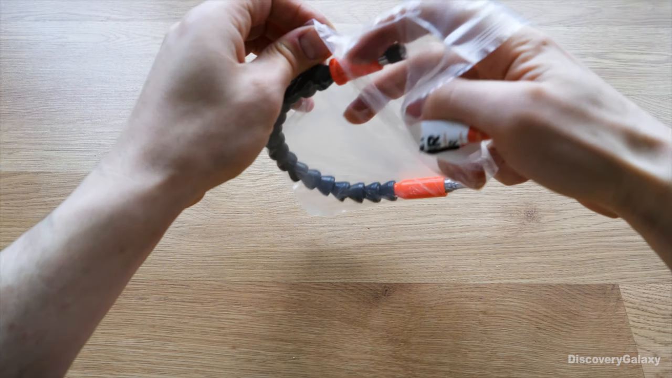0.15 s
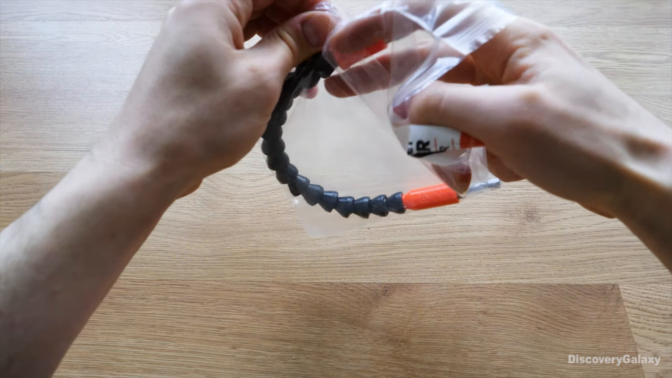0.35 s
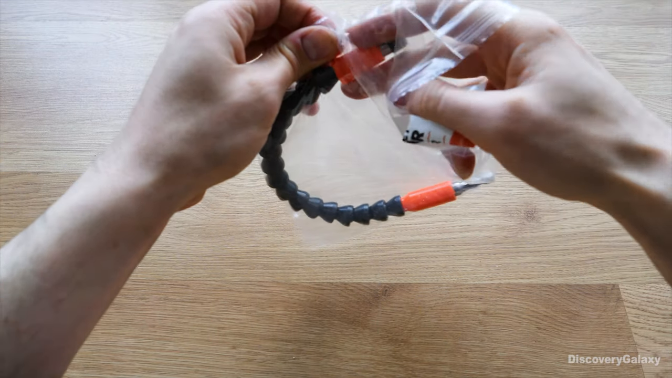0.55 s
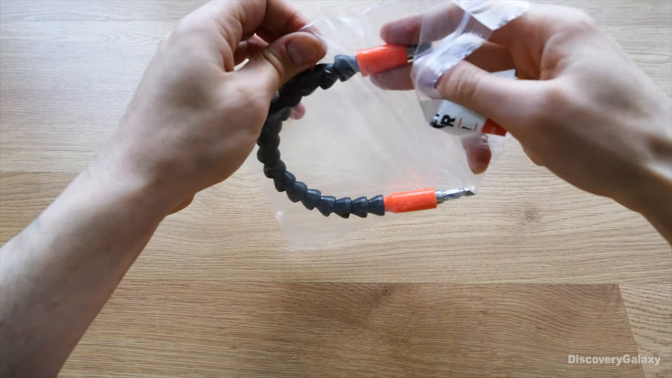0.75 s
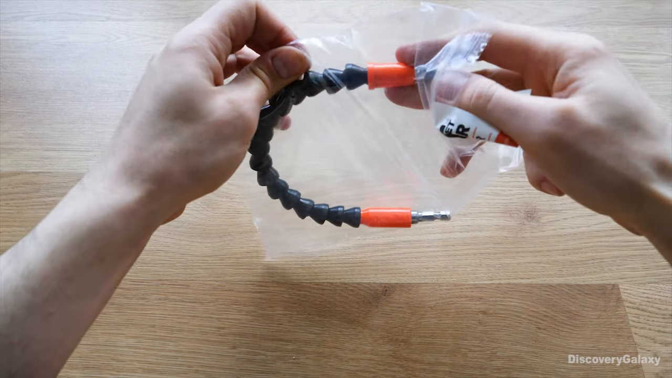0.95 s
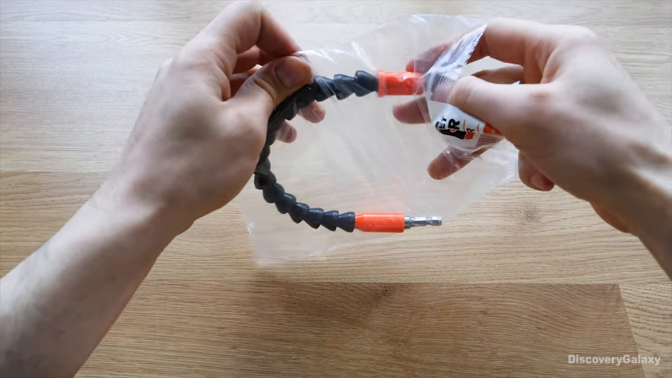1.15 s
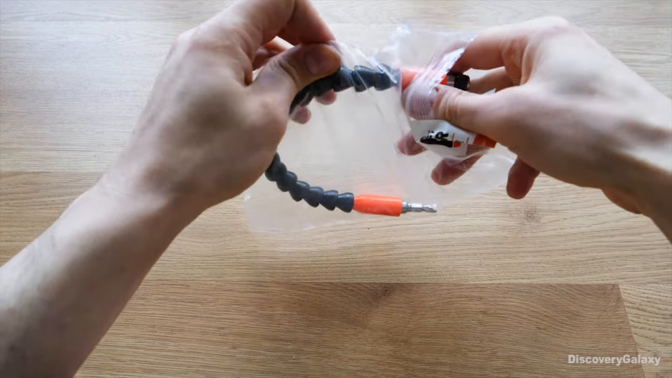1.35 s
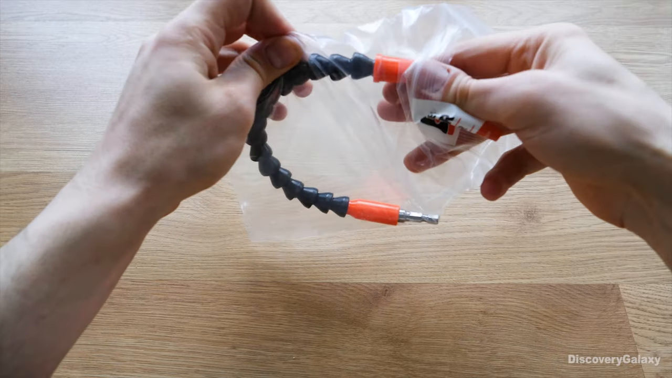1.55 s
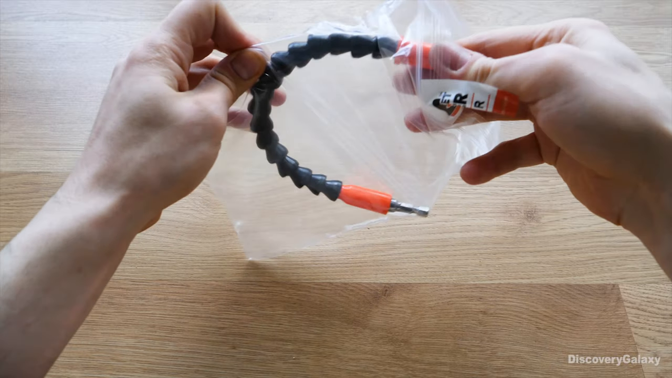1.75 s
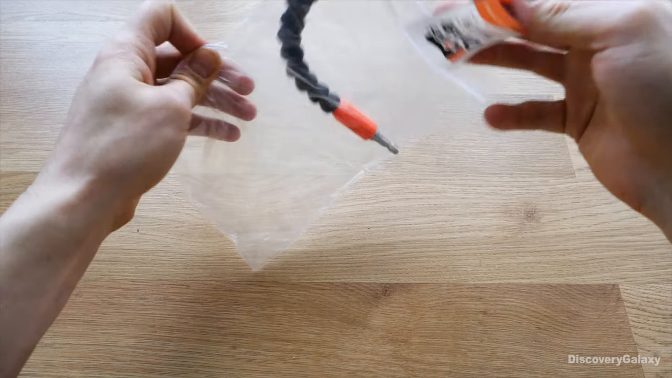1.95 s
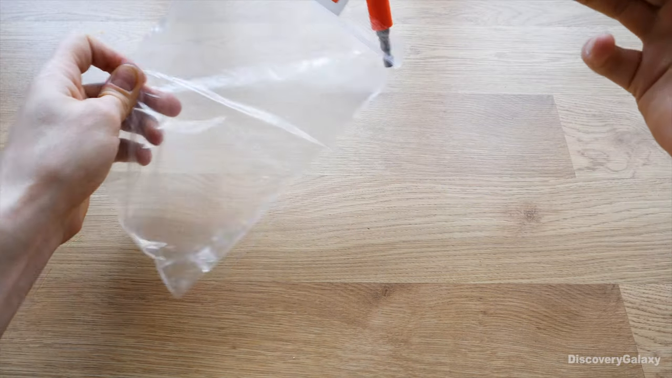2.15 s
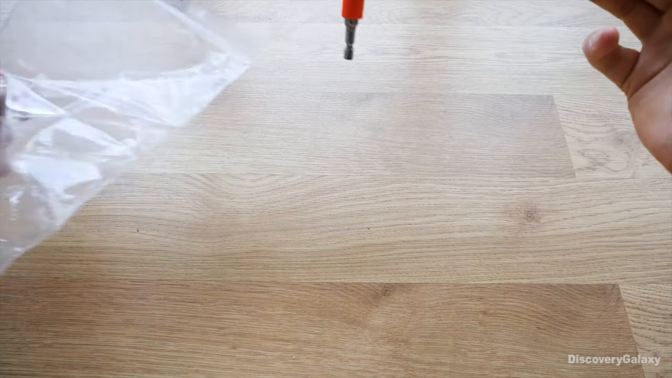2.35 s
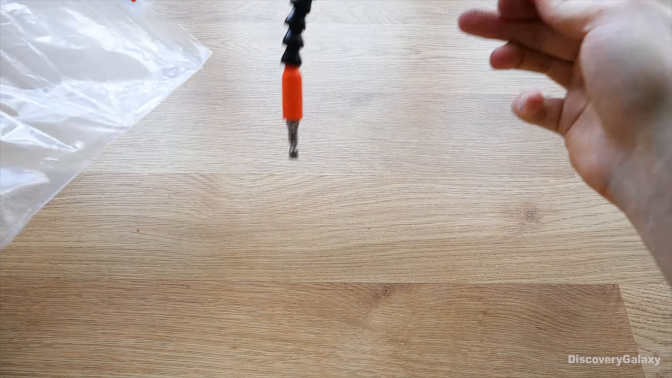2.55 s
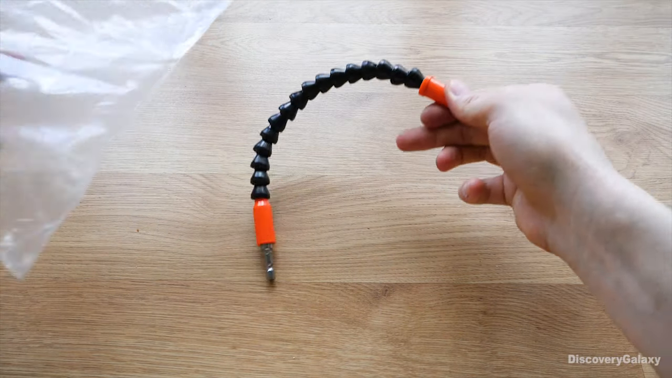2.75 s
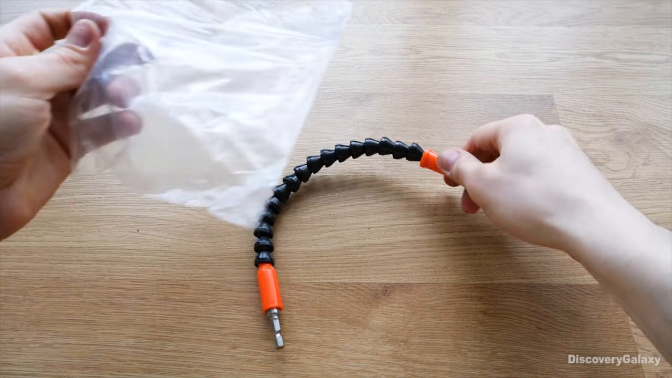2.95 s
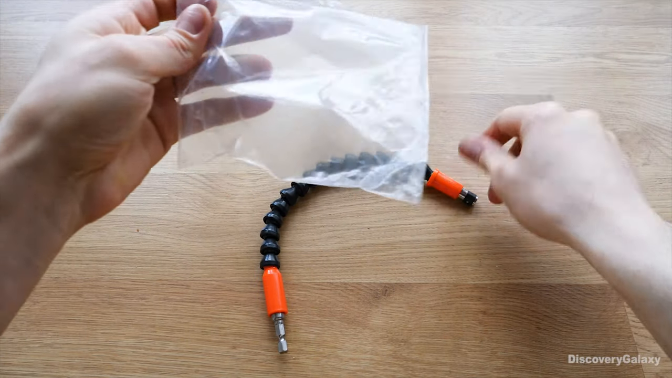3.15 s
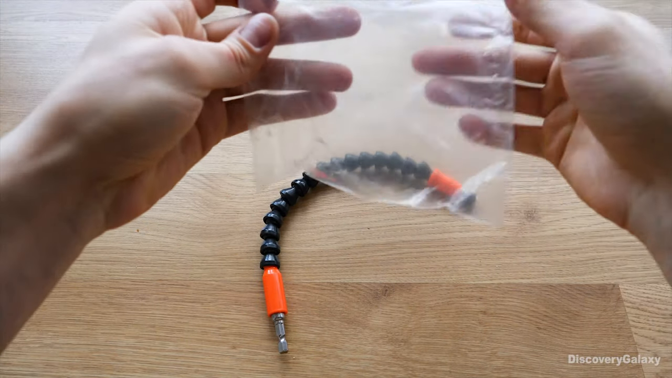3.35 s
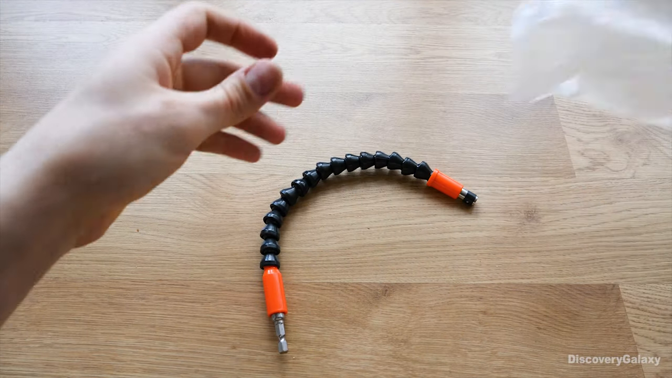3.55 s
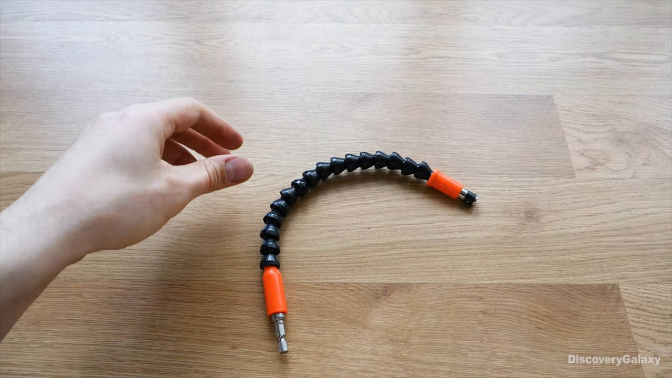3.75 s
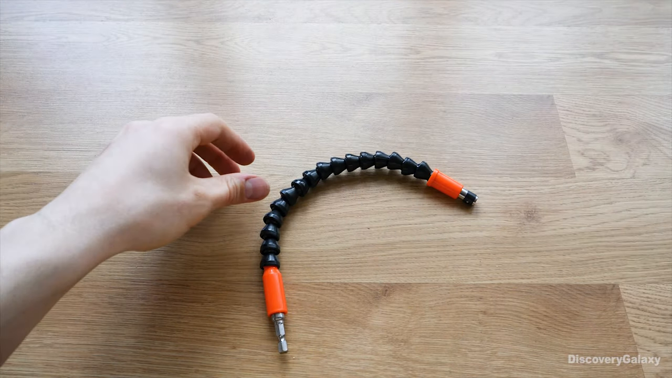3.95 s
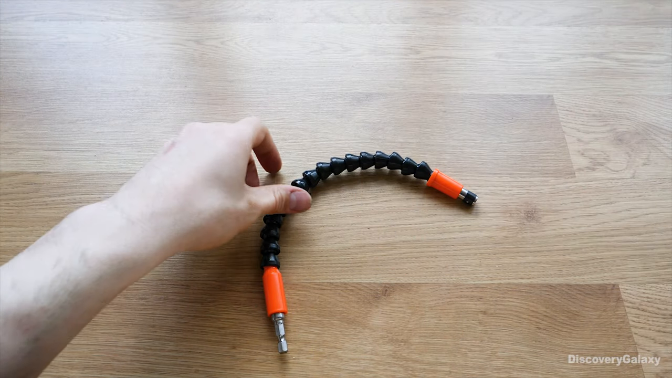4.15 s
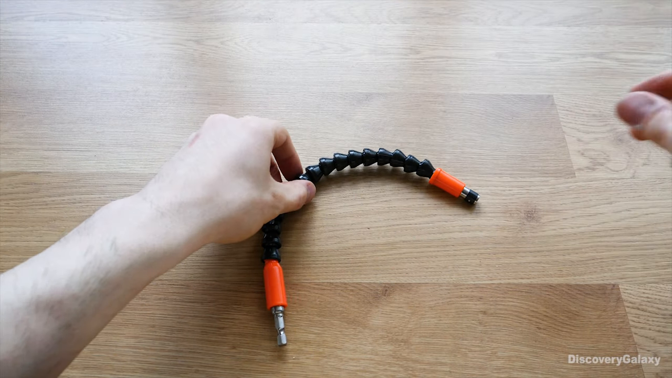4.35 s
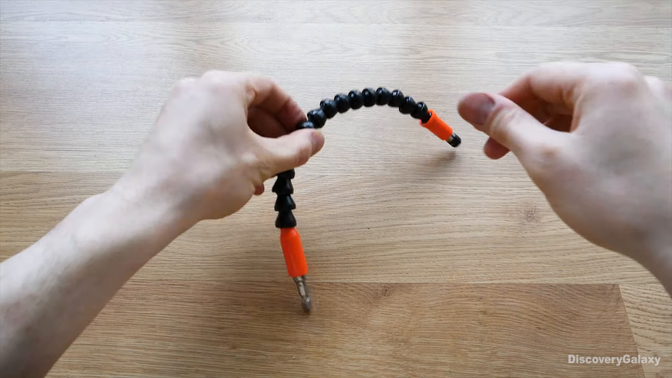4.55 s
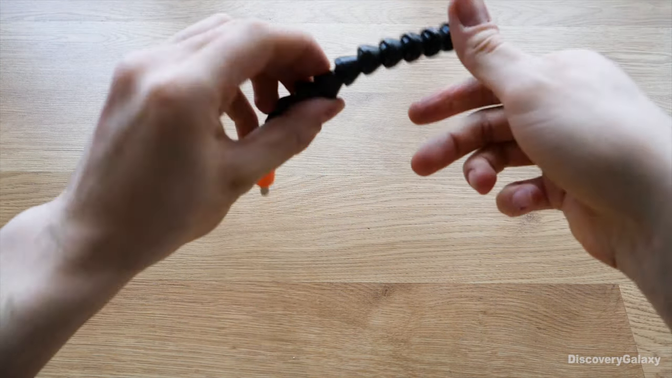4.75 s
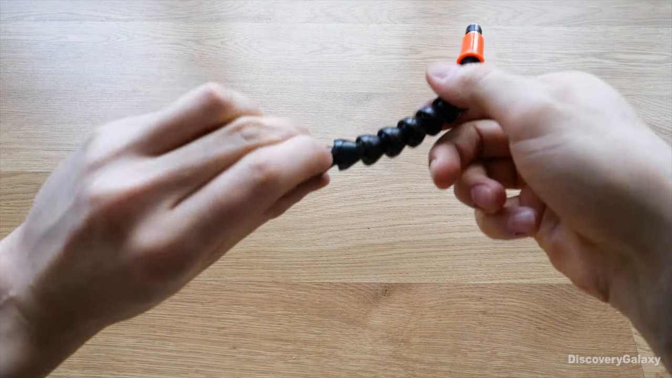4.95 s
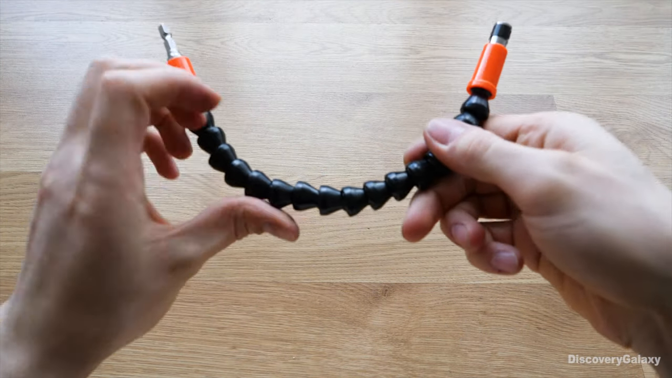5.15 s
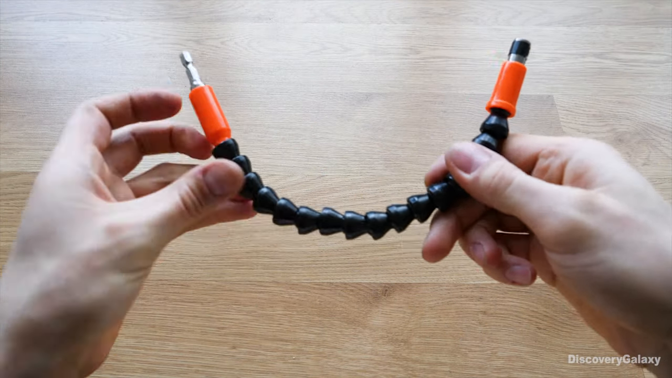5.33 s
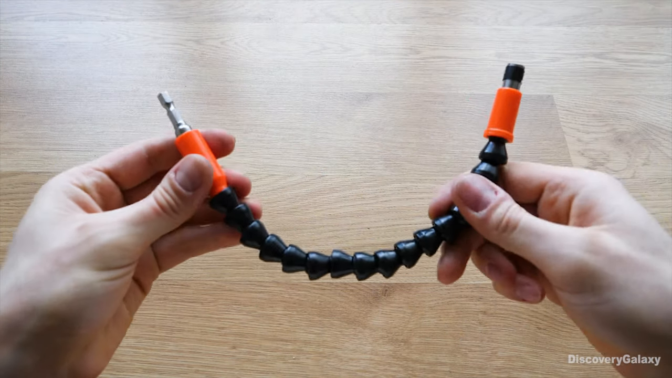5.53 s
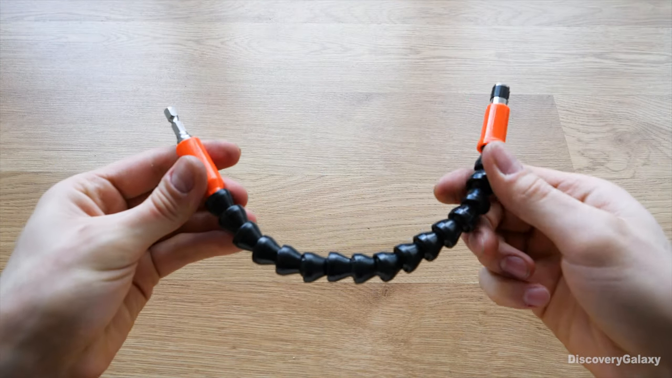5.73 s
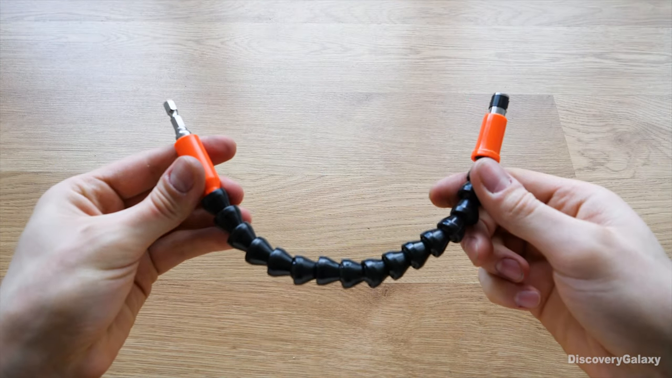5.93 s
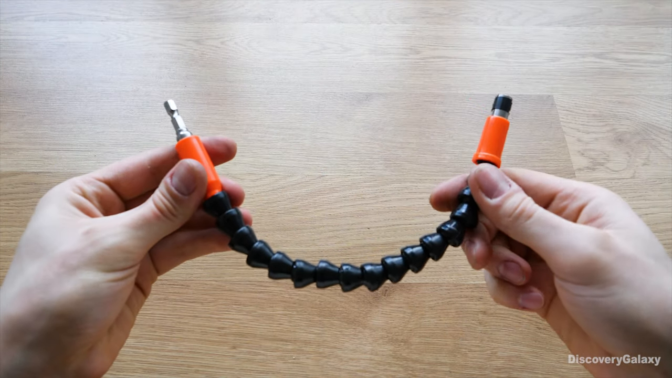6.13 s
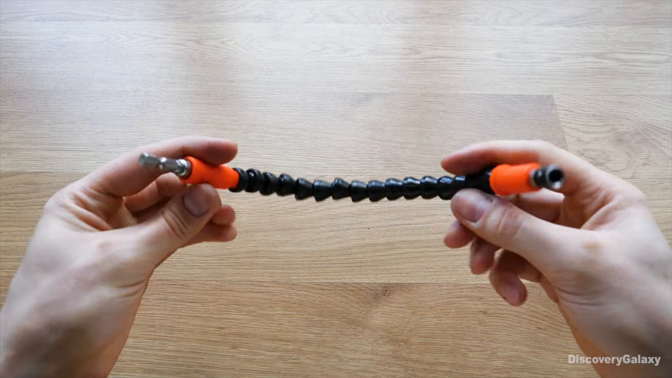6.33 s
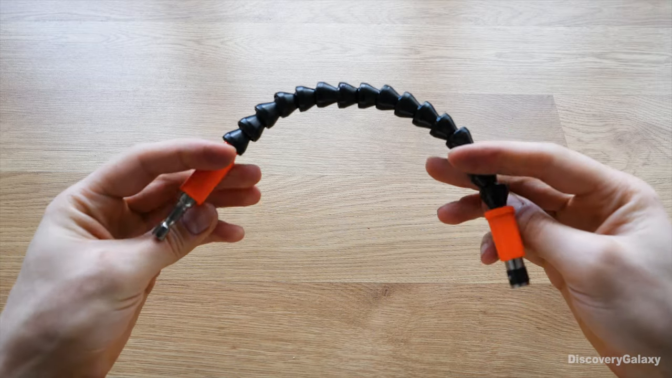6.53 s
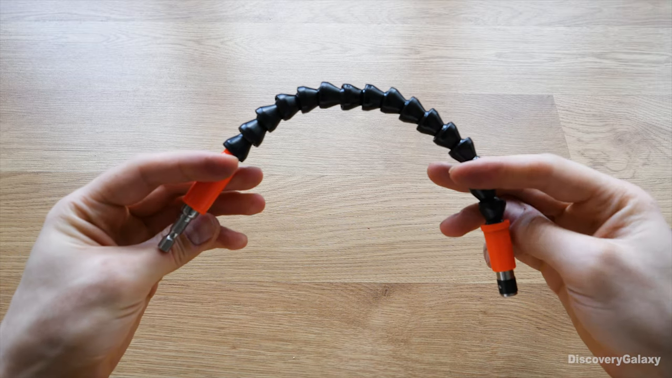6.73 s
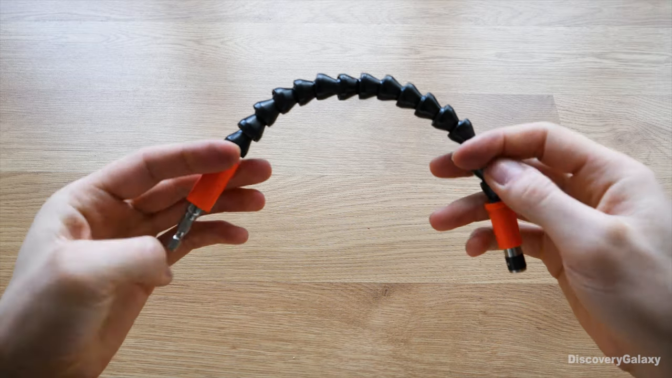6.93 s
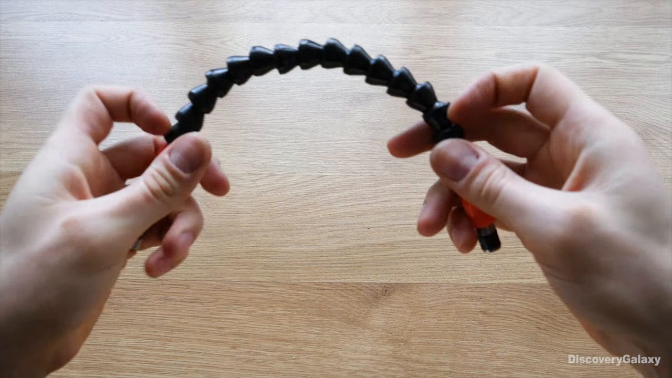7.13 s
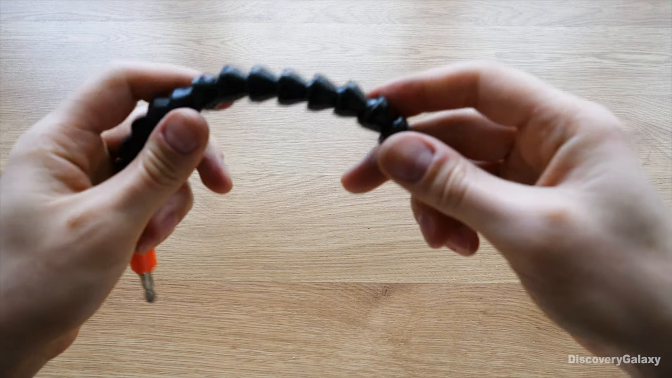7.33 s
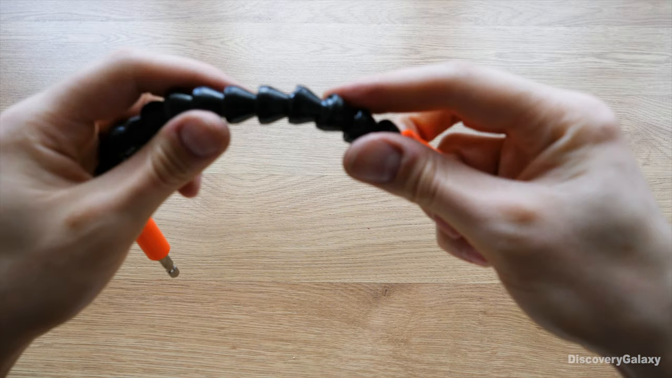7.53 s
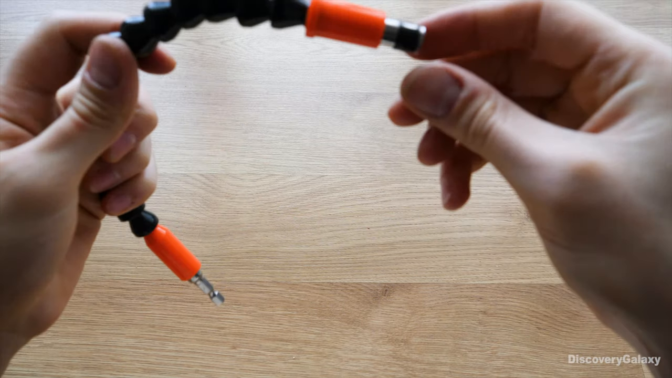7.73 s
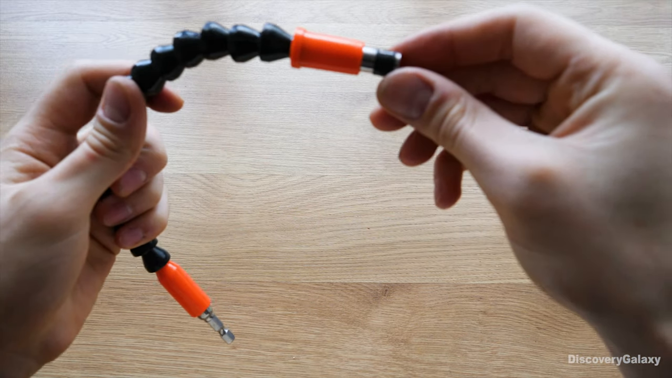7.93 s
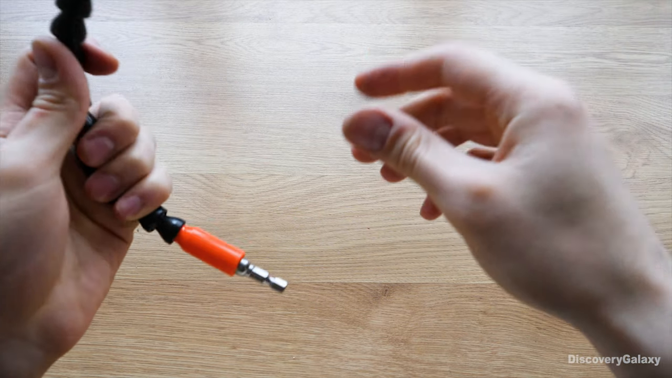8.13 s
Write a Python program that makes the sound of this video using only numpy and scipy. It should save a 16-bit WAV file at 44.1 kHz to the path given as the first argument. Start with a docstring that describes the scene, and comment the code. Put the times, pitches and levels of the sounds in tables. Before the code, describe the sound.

Crisp film crinkling fills the first two and a half seconds, loudest as the tool comes free. Hard plastic raps and rattles on a wooden tabletop, its sharpest blows distorting the close microphone. Short soft bag rustles follow, then a tap and a hollow scrape. The rest is nearly quiet: small irregular plastic clicks and thin squeaks in the fingers, with a short indoor echo and faint floor noise.

```python
"""Small room, wooden table: a thin plastic bag crackles as a jointed plastic tool is pulled out of it. The tool
drops on the table, rocks, is dragged up again, then ticks and squeaks softly in the fingers. Film: filtered
snaps over fine crackle. Tool: noise bursts, stick-slip grit and resonances. Low rumble and faint hiss lie
underneath; the loudest snaps and knocks clip at full scale."""
import sys
import numpy as np
from scipy import signal
from scipy.fft import rfft, irfft
from scipy.io import wavfile
from scipy.ndimage import uniform_filter1d

SR = 44100
rng = np.random.default_rng(int(sys.argv[2]) if len(sys.argv) > 2 else 0)


def log_audio(samples):
    """Write samples as a 16-bit WAV file to the path given in sys.argv[1]."""
    # one column per channel
    frames = np.atleast_2d(samples).T
    # limit to full scale, then quantise
    limited = np.clip(frames, -1, 1)
    pcm = np.round(limited * 32767).astype(np.int16)
    wavfile.write(sys.argv[1], SR, pcm)


N = 365148
POP_LEAD_S = 200 / SR  # silence ahead of the release in a pop


def gain_of(db):
    """Decibels to gain."""
    return 10 ** (np.asarray(db) / 20)


def evened(x):
    """Scales to rms 1."""
    return x / np.sqrt(np.mean(x ** 2) + 1e-20)


def read(points, hz):
    """Looks up a spectrum on a log-frequency axis."""
    f, value = np.transpose(points)
    return np.interp(np.log(hz + 1), np.log(f + 1), value)


def curves(tables):
    """Gains over time of a level column and of columns given against it; silent outside the tables."""
    t, out = np.arange(N) / SR, 0
    for rows in tables:
        s, db, *rel_db = np.transpose(rows)
        columns_db = [db, *(db + r for r in rel_db)]
        out = out + gain_of([np.interp(t, s, c, -200, -200) for c in columns_db])
    return abs(uniform_filter1d(out, size=200, axis=1))


def colour(x, points):
    """Causal minimum-phase filter with the given spectrum shape, its energy 1."""
    db = np.maximum(read(points, abs(np.fft.fftfreq(8192, 1 / SR))), -90)
    log_gain = np.log(gain_of(db))
    taps = np.fft.ifft(np.exp(np.conj(signal.hilbert(log_gain)))).real[:2048]
    return signal.oaconvolve(x, taps / np.linalg.norm(taps))[:len(x)]


def add(mix, s, sound):
    """Mixes a sound in at a time."""
    part = mix[round(s * SR):][:len(sound)]
    part += sound[:len(part)]


def carrier(hz, count):
    """Complex rotation that follows the frequency hz."""
    return np.exp(2j * np.pi * np.cumsum(hz * np.ones(count)) / SR)


def resonate(x, hz, width_hz):
    """Shifts hz down to zero, smooths with one pole, and shifts back: a resonance of gain 1."""
    turn = carrier(hz, len(x))
    r = np.exp(-np.pi * width_hz / SR)
    return 2 * (turn * signal.lfilter([1 - r], [1, -r], x / turn)).real


def band(x, hz, width_hz):
    """A steep-sided band that follows hz; rms 1."""
    turn = carrier(hz, len(x))
    lowpass = signal.butter(5, width_hz / 2, fs=SR, output="sos")
    return evened((turn * signal.sosfilt(lowpass, x / turn)).real)


def hump(hz, centre_hz, octaves):
    """A bell-shaped band on a log-frequency axis."""
    return np.exp(-.5 * (np.log2((hz + 1) / centre_hz) / octaves) ** 2)


def hiss():
    """Steady coloured noise: the faint floor."""
    # f/Hz, relative level/dB per Hz
    floor = [(60, -21.5), (100, -1), (150, -14.5), (370, -10), (520, -12), (800, -20), (1500, -24.5),
             (3000, -31), (6000, -33.5), (10000, -38), (12500, -45.5), (16000, -48), (20000, -48)]
    return gain_of(-76) * evened(colour(rng.standard_normal(N), floor))


def rumble():
    """Shaking of table and stand: three low noise bands, the lowest on its own level curve."""
    # t/s, level/dB, upper bands against it/dB
    shaking = [(0, -64, 2), (.87, -55, -8.5), (1.64, -59, -9.5), (1.96, -32, -0.5), (2.1, -49.5, -3),
               (2.72, -66, -2.5), (2.84, -39, -6), (3.11, -39, -5), (3.2, -24.5, -7), (3.39, -40, -25),
               (3.48, -42, -3), (3.87, -49.5, -21), (3.99, -65.5, 3), (4.15, -50, -12.5), (4.36, -64, 6.5),
               (4.59, -58, 5), (4.73, -68.5, -1), (5.46, -63, -14), (6.85, -76, -9), (7.12, -53.5, -7.5),
               (7.36, -52, -24), (8.28, -64.5, -16)]
    level, upper = curves([shaking])
    a, b, c = rng.standard_normal((3, N))
    return level * band(a, 45, 24) + upper * (band(b, 88, 60) + gain_of(-3) * band(c, 180, 120))


def bag_flops():
    """Low puffs of air as the bag flops: bell-shaped swells of band noise."""
    # t/s, level/dB
    flops = [(.05, -47), (.27, -44), (.64, -49), (1.07, -48.5), (1.67, -42), (2.18, -40.5), (2.37, -45),
             (3.52, -44), (4.1, -62), (4.3, -54)]
    t, spread_s = np.arange(N) / SR, .025
    puffs = sum(gain_of(db) * np.exp(-((t - s) / spread_s) ** 2) for s, db in flops)
    return puffs * band(rng.standard_normal(N), 140, 210)


def grit(per_s, spread_db, smooth):
    """Random clicks of very uneven size over a smooth share of noise."""
    size = gain_of(spread_db * np.minimum(rng.exponential(1, N), 4)) * rng.choice([-1., 1.], N)
    clicks = size * (rng.random(N) < per_s / SR)
    return (1 - smooth) * evened(clicks) + smooth * rng.standard_normal(N)


def drag():
    """Tool rocking and dragging: stick-slip grit drives the wood below and the hard plastic above."""
    # one list per stretch: t/s, table ring/dB, then against it: hard scrape/dB, dull rub/dB
    stretches = [
        [(2.84, -60, -16, -34), (2.904, -22, -8.5, -5.5), (3.072, -27, -11.5, -14.5), (3.164, -50.5, 8.5, -4),
         (3.17, -34, 3, -1)],
        [(4.2, -52.5, -11, -14), (4.25, -70.5, 11, 3.5), (4.306, -49, -15.5, -15.5), (4.43, -62, -7.5, -9),
         (4.45, -46, -20.5, -20.5)],
        [(4.462, -28.5, -10, 7.5), (4.472, -37, -12, -30), (4.53, -36.5, 13, 4), (4.638, -39, 12, 3),
         (4.762, -73, 17, -7.5), (4.84, -73, 3.5, -3)],
    ]
    # wood resonances: f/Hz, width/Hz before broadening, level/dB
    wood_modes = [(397, 39, 0.5), (743, 180, -4.5), (1150, 29, -19.5)]
    # hard scrape: f/Hz, relative level/dB per Hz
    scrape = [(590, -39), (1000, -5), (1120, -19), (1200, -5.5), (2150, 4.5), (2710, -3), (4960, -6),
              (10300, -28.5), (14400, -57), (16000, -55.5)]
    ring, hard, dull = curves(stretches)
    slips = grit(per_s=1800, spread_db=2.5, smooth=.2)
    wood = 0
    for hz, width_hz, db in wood_modes:
        pole_width_hz = 2.1 * width_hz  # two passes narrow it again
        mode = resonate(resonate(slips, hz, pole_width_hz), hz, pole_width_hz)
        wood = wood + gain_of(db) * evened(mode)
    return ring * evened(wood) + hard * evened(colour(slips, scrape)) + dull * band(slips, 680, 900)


def knocks():
    """Each blow gives a crack, a rattle of the joints that dies away, and the ring of the table."""
    # t/s, level/dB, hardness (treble gain)/dB, relative thud/dB
    blows = [(2.777, -4, 6.5, -14.5), (2.867, -12.5, -10, -20), (2.907, -14, -8, 10), (3.178, 3, 1, -4),
             (3.301, -25.5, 6.5, -21), (4.0218, -24.5, 5, -16), (4.4574, -39, -19, -6)]
    # crack and rattle: f/Hz, relative level/dB per Hz
    blow_colour = [(59, -38), (100, -5), (206, -13), (266, -5), (784, 2), (1310, -8), (1420, 2),
                   (1830, 0.5), (2370, 1), (3540, -5.5), (4670, -0.5), (7140, -10.5), (16000, -46.5)]
    # table top and tool: f/Hz, relative level/dB, t60/s
    table_modes = [(54, 2.5, 0.2), (198, -1.5, 0.11), (358, 1, 0.11), (417.9, 1, 0.13), (795, -7, 0.19)]
    out, t = np.zeros(N), np.arange(SR // 2) / SR
    ring = sum(gain_of(db - 60 * t / t60) * np.sin(2 * np.pi * hz * t) for hz, db, t60 in table_modes)
    highpass = signal.butter(1, 3000, "high", fs=SR)
    for s, db, hard_db, thud_db in blows:
        decay = np.exp(-t / 0.0021) + 0.33 * np.exp(-t / 0.038)
        rattle = colour(2.5 * (t == 0) + rng.standard_normal(len(t)) * decay, blow_colour)
        hardened = rattle + (gain_of(hard_db) - 1) * signal.lfilter(*highpass, rattle)
        add(out, s, gain_of(db) * (hardened + gain_of(thud_db) * 0.18 * ring))
    return out


def joint_ticks():
    """Joints clicking: a noise burst and its rattle excite the joint modes near its centre, unevenly."""
    # t/s, peak/dB, centre f/Hz, spread/octaves, half the rattle's bell decay/s
    ticks = [(5.177, -47, 4000, 0.97, 0.011), (5.192, -45.5, 2506, 0.91, 0.013),
             (5.204, -41, 4300, 0.92, 0.013), (5.225, -54, 5060, 0.58, 0.031),
             (5.296, -36.5, 4420, 0.62, 0.016), (5.395, -70, 4980, .3, 0.015),
             (5.539, -65, 6800, .25, .015), (6.369, -62, 6470, 0.64, 0.017),
             (6.861, -60.5, 7990, .4, 0.017), (7.118, -51, 2800, 0.65, 0.0084),
             (7.146, -61, 9100, 0.37, 0.013), (7.199, -45.5, 5960, 0.77, 0.011),
             (7.227, -49, 6540, 0.45, 0.026), (7.265, -52, 6000, 0.89, 0.012),
             (7.546, -46.5, 4770, 0.7, 0.021), (7.641, -45, 2590, 1.03, 0.018),
             (7.661, -44.5, 3600, 0.28, 0.0081)]
    # plastic joints: nominal f/Hz, width/Hz before widening, relative level/dB
    joints = [(1420, 360, 2), (2180, 480, 9), (2800, 230, -1), (3470, 300, -2), (4140, 350, 5),
              (5450, 840, 7.5), (6300, 310, 0.5), (7280, 600, 2.5), (8750, 480, 2.5), (10300, 450, -13)]
    out, t = np.zeros(N), np.arange(4000) / SR
    uneven_db = 3.0 * rng.standard_normal((len(ticks), len(joints)))
    # each tick sits slightly higher or lower in pitch, at random
    pitch_factors = 1 + .025 * rng.standard_normal(len(ticks))
    for (s, db, centre_hz, octaves, half_rattle_s), uneven, pitch in zip(ticks, uneven_db, pitch_factors):
        decay = np.exp(-t / 0.00076) + 0.086 * np.exp(-(t / (2.0 * half_rattle_s)) ** 2)
        shake = rng.standard_normal(len(t)) * decay
        tick = np.zeros(len(t))
        for (hz, width_hz, mode_db), mode_uneven_db in zip(joints, uneven):
            mode_hz, pole_width_hz = hz * pitch, 1.2 * width_hz
            mode = evened(resonate(resonate(shake, mode_hz, pole_width_hz), mode_hz, pole_width_hz))
            tick += gain_of(mode_db + mode_uneven_db) * hump(hz, centre_hz, octaves) * mode
        add(out, s, gain_of(db) * tick / abs(tick).max())
    return out


def squeaks_and_hisses():
    """Noise bands, narrow to broad, some gliding: squeaks, a hollow scrape ring, faint lingering hiss."""
    # t/s, length/s (cut at 0.5 s), start f/Hz, end f/Hz, width/Hz, level/dB
    bands = [(4.372, 0.056, 4200, 4190, 3060, -62.5), (4.464, 0.13, 1736, 2270, 700, -28),
             (4.751, 0.53, 4394, 4410, 4500, -78), (4.75, 0.56, 692, 699, 1494, -71.5),
             (6.592, .11, 8500, 8930, 557, -66), (6.59, 0.13, 6700, 6650, 896, -67.5),
             (6.877, 0.21, 5400, 5070, 757, -62), (7.011, 0.19, 6090, 6600, 753, -51.5),
             (7.004, 0.054, 583, 395, 686, -58.5), (7.1, 0.11, 242, 238, 99.3, -60.5),
             (7.203, 0.12, 4540, 4600, 990, -68), (8.087, .06, 2530, 2560, 250.6, -75),
             (7.348, .2, 6060, 5800, 2600, -74), (7.361, 0.072, 10100, 10100, 1400, -74)]
    out = np.zeros(N)
    for s, length_s, start_hz, end_hz, width_hz, db in bands:
        noise = rng.standard_normal(SR // 2)
        u = np.minimum(np.arange(len(noise)) / SR / length_s, 1)
        swell = abs(np.sin(np.pi * u ** 0.54)) ** 1.95  # quick rise, slower fade
        add(out, s, gain_of(db) * swell * band(noise, start_hz + (end_hz - start_hz) * u, width_hz))
    return out


def pops(centre_hz, octaves, fizz_s, noise):
    """One row per pop: a sudden release and its fizz through a band; peak 1, starting POP_LEAD_S in."""
    t = np.arange(noise.shape[1]) / SR - POP_LEAD_S
    fizz = (t >= 0) * noise * np.exp(-abs(t) / fizz_s)
    release = fizz + 3.64 * (abs(t) < .5 / SR)
    out = irfft(rfft(release) * hump(np.fft.rfftfreq(len(t), 1 / SR), centre_hz, octaves))
    return out / abs(out).max(1, keepdims=True)


def crackle(count, per_s, spread_db, smooth):
    """Countless small pops, each family with its own colour, over a smooth share of noise."""
    centres_hz = np.geomspace(700, 13000, count)[:, None]
    shapes = pops(centres_hz, 1.0, .0009, rng.standard_normal((count, 800)))
    size = gain_of(spread_db * np.minimum(rng.exponential(1, N), 3)) * (rng.random(N) < per_s / SR)
    family = rng.integers(0, count, N)
    grains = np.zeros(N)
    for k, shape in enumerate(shapes):
        grains += signal.oaconvolve(size * (family == k), shape / np.linalg.norm(shape))[:N]
    return (1 - smooth) * evened(grains) + smooth * rng.standard_normal(N)


def film_bed(level):
    """Film sliding in the hands: fine crackle, duller flap of the sheet and bright sizzle."""
    # f/Hz, relative level/dB per Hz: crackle, flapping sheet, sizzle
    film = [(590, -30.5), (1000, -11.5), (1300, -4), (1900, 1), (2210, 5), (2720, -0.5), (3950, 0),
            (8000, -6), (10400, -25.5), (17600, -120)]
    film_low = [(140, -35.5), (230, -2.5), (323, -11), (370, 2.5), (441, -4.5), (683, 4), (1400, -11),
                (1820, -24), (3080, -120)]
    film_top = [(4120, -21), (7000, 3), (10100, -1), (12600, -20.5), (14500, -7), (16000, -13.5)]
    surge = level / (uniform_filter1d(level, round(0.18 * SR)) + 1e-6)
    flap = level * gain_of(-10.5) * surge ** 0.83  # sudden moves add flap and sizzle
    dull = np.minimum(level / gain_of(-40.5), 1) ** .4  # faint rustle loses its top
    sizzle = dull * level * gain_of(-10) * surge ** .7
    # gentle sliding hisses more than it crackles
    smooth = np.clip(0.57 + 0.17 * np.exp(-level / .004), 0, 1)
    bed = crackle(count=14, per_s=830, spread_db=4.0, smooth=smooth)
    bed = bed * gain_of(3.0 * band(rng.standard_normal(N), 30, 44))  # creases give way in clumps
    layers = (level, film), (flap, film_low), (sizzle, film_top)
    return sum(gain * evened(colour(bed, points)) for gain, points in layers)


def lesser_snaps(rustle):
    """Times, levels and pitches of random small snaps that follow the rustle."""
    per_s, end_s = 40, 4.3
    place, size, pitch = rng.random((round(per_s * end_s), 3)).T
    s = place * end_s
    rustle_db = 20 * np.log10(rustle[(s * SR).astype(int)])
    db = rustle_db + 9 - 2 * np.log(np.maximum(size, .05))
    return [s, db, 3500 * 2 ** (0.41 * (2 * pitch - 1))]


def film_snaps(rustle):
    """Creases giving way, listed and random; low and bright parts depend on pitch, bright also on level."""
    # creases that snap on their own: t/s, level/dB, centre f/Hz
    creases = [(.0323, -11.5, 7240), (.0386, -3.5, 10300), (0.0525, -22, 4050), (.105, -6, 6400),
               (.1212, -9.5, 8100), (.1774, -13, 5200), (.218, 0.5, 7000), (.2717, -4, 7400),
               (.2817, -6.5, 6040), (.2874, -5.5, 5460), (.3009, -9.5, 6040), (0.3172, -14, 5960),
               (.3592, -12, 5260), (.378, -18.5, 7580), (0.4213, -16.5, 4940), (.4453, -15, 5320),
               (.4499, -4.5, 5100), (.4557, -10.5, 5160), (.4663, -9, 7700), (.485, -15, 5000),
               (.5489, -17, 4570), (.5959, -4, 7100), (.6132, -14, 8850), (.6493, -6.5, 7500),
               (.6751, -12, 5840), (.6864, -14, 5280), (.6957, -9.5, 5800), (.7126, -12, 7300),
               (0.7182, -14, 6540), (0.768, -20, 7170), (.7773, -11, 5860), (.7889, -13, 6860),
               (.8034, -12.5, 4900), (.8408, -14, 5000), (.8827, -9.5, 6300), (.8922, -8, 5140),
               (.907, -7.5, 5500), (.9285, -11.5, 4970), (.985, -19, 4340), (1.0154, -11, 6200),
               (1.0481, -15.5, 2480), (1.0595, -10, 7600), (1.0718, -13, 8050), (1.1107, -11, 5560),
               (1.1443, -13.5, 7050), (1.1707, -21, 4400), (1.1951, -3, 6050), (1.2204, -14.5, 2380),
               (1.2279, -14, 7040), (1.2659, -2.5, 4100), (1.2881, -6.5, 3800), (1.307, -10.5, 4170),
               (1.3423, -5.5, 5900), (1.3788, -9.5, 9600), (1.3896, -2, 9500), (1.3963, -6.5, 7300),
               (1.4052, -11.5, 10000), (1.4156, -11, 4950), (1.4548, -6.5, 5200), (1.4769, -10, 7340),
               (1.5105, -4.5, 6100), (1.5405, -5.5, 3730), (1.6042, -17.5, 6800), (1.6534, -6, 4840),
               (1.659, -9, 5900), (1.7061, -14, 7600), (1.7386, -6.5, 3425), (1.7414, -6.5, 7300),
               (1.8027, 2.5, 7000), (1.8133, -1, 2700), (1.8332, -3.5, 5370), (1.8454, 1.5, 3700),
               (1.884, -1.5, 4040), (1.8961, -5.5, 7620), (1.9125, -1, 6000), (1.9225, -5.5, 2350),
               (1.9318, -4, 2500), (1.9364, 5.5, 8350), (1.9398, -.5, 4500), (1.9813, -3, 5070),
               (1.9832, 1.5, 6130), (1.996, -1.5, 3800), (2.0483, -10, 5850), (2.0768, -17, 5000),
               (2.0851, -11.5, 5400), (2.1032, -16, 6300), (2.1557, -13.5, 5000), (2.169, -15.5, 2520),
               (2.1763, -10, 5080), (2.2177, -10.5, 2760), (2.2709, -6.5, 6340), (2.2826, -18, 2520),
               (2.2971, -19, 4890), (2.3148, -6.5, 9900), (2.3402, -24, 2630), (2.3611, -4.5, 3900),
               (2.378, -7.5, 6260), (2.447, -22, 5600), (2.4719, -16, 6600), (2.5158, -19, 4300),
               (2.6394, -33.5, 2500), (2.6506, -36, 2856), (2.6872, -40.5, 4840), (2.772, -20.5, 6930),
               (2.9341, -13.5, 1670), (2.9869, -16.5, 5950), (2.9996, -17, 2040), (3.0237, -17, 1790),
               (3.0663, -16, 3700), (3.1197, -22.5, 6600), (3.1382, -21.5, 4300), (3.4039, -23, 2600),
               (3.4533, -38, 2600), (3.4701, -44, 3000), (3.4822, -24, 4100), (3.5144, -24, 6630),
               (3.5329, -25, 3500), (3.5912, -26, 3950), (3.6087, -21.5, 5800), (3.6251, -22, 2490),
               (3.6391, -28.5, 2950), (3.6707, -26, 4050), (3.7212, -28, 4000), (3.783, -36, 3000),
               (3.8142, -25, 2950), (3.9062, -40.5, 2600), (4.0869, -21, 3940), (4.1168, -22.5, 5600),
               (4.1428, -20, 4370)]
    s, db, hz = np.hstack([np.transpose(creases), lesser_snaps(rustle)])[:, :, None]
    draws = rng.standard_normal((len(s), 802))
    noise, octave = draws[:, 2:], np.log2(hz / 4000)
    low_db = -17 - 5.5 * octave + 3.5 * draws[:, :1]  # deeper creases move more sheet
    top_db = -8.5 + octave + 2.5 * draws[:, 1:2]
    top_db = top_db + 1.06 * np.minimum(db + 19, 0)  # snaps under -19 dB are duller
    fizz_s = 0.0011 * gain_of(0.067 * np.maximum(db, -50))  # larger creases take longer to give way
    pop = pops(hz, 1.0, fizz_s, noise)
    pop = pop + .5 * pops(hz, 0.3, fizz_s, noise)  # each crease rings at its own pitch
    pop = pop + gain_of(top_db) * pops(7500, 0.82, 1.4 * fizz_s, noise)
    thump = np.roll(pops(610, 0.86, 0.0012, noise), round(.0012 * SR), axis=1)
    pop = pop + gain_of(low_db) * thump  # the sheet follows a moment later
    out = np.zeros(N)
    for start_s, sound in zip(s[:, 0], gain_of(db) * pop):
        add(out, max(start_s - POP_LEAD_S, 0), sound)
    out = signal.lfilter(*signal.butter(1, 11000, fs=SR), out)  # the film radiates less at the very top
    return out + .75 * resonate(out, 2200, 460)  # the pouch of air in the bag


def bag():
    """Listed snaps, with small random snaps and a film bed that follow the rustle level."""
    # one list per stretch: t/s, level/dB
    stretches = [
        [(0, -32), (.09, -38.5), (.28, -29.5), (.33, -38.5), (.48, -35.5), (.58, -46.5), (.62, -37.5),
         (.9, -33), (.96, -38.5), (1.18, -39), (1.3, -31), (1.48, -31.5), (1.55, -38.5), (1.66, -30.5),
         (1.71, -32), (1.79, -32), (1.875, -22.5), (1.93, -16.5), (1.96, -15), (1.978, -26.5), (2.0, -19),
         (2.09, -26), (2.13, -38.5), (2.17, -30.5), (2.38, -29), (2.55, -51.5), (2.76, -65)],
        [(3.3, -50), (3.39, -54.5), (3.44, -40.5), (3.52, -33.5), (3.566, -49), (3.616, -42.5), (3.796, -54.5),
         (3.808, -45), (4.01, -76.5)],
        [(4.03, -52.5), (4.138, -42.5), (4.26, -56.5), (4.31, -75)],
    ]
    level = curves(stretches)[0]
    return film_snaps(level + 1e-12) + film_bed(level)


def room(x):
    """Sparse taps of random sign, one in every 20 samples, each band dying at its own speed."""
    # f/Hz, t60/s
    decay = [(100, 0.35), (400, 0.1), (1100, 0.092), (2900, 0.13), (7700, 0.14), (15000, 0.15)]
    taps = np.zeros(SR // 2)
    at = np.arange(140, len(taps) - 20, 20)
    taps[at + rng.integers(0, 20, len(at))] = rng.choice([-1., 1.], len(at))
    hz, t, z = signal.stft(taps, SR, nperseg=256)
    fade = gain_of(-60 * t / read(decay, hz)[:, None])
    tail = signal.istft(z * fade, SR, nperseg=256)[1]
    return signal.fftconvolve(x, tail / np.linalg.norm(tail))[:N]


def scene():
    """All sources near the microphone, with the table echo, the room and a faint floor."""
    background = hiss() + rumble() + bag_flops()
    tool = drag() + knocks()
    hand = joint_ticks() + squeaks_and_hisses()
    film = bag()
    near = film + tool + hand
    near = near + 0.056 * np.pad(near, (round(.0022 * SR), 0))[:N]  # bounce off the table top
    wet = room(gain_of(-11.5) * (film + tool) + gain_of(-6.5) * hand)
    return (near + wet + background)[None]


def record(dry):
    """The microphone drops the deepest bass, the converter clips at full scale; then the band limit."""
    mic = signal.lfilter(*signal.butter(2, 30, "high", fs=SR), dry)
    lowpass = signal.firwin(511, 16200, window=("kaiser", 9), fs=SR)
    return signal.oaconvolve(np.clip(mic, -1, 1), lowpass[None], "same")


dry = scene()
out = record(dry)
log_audio(out)
```